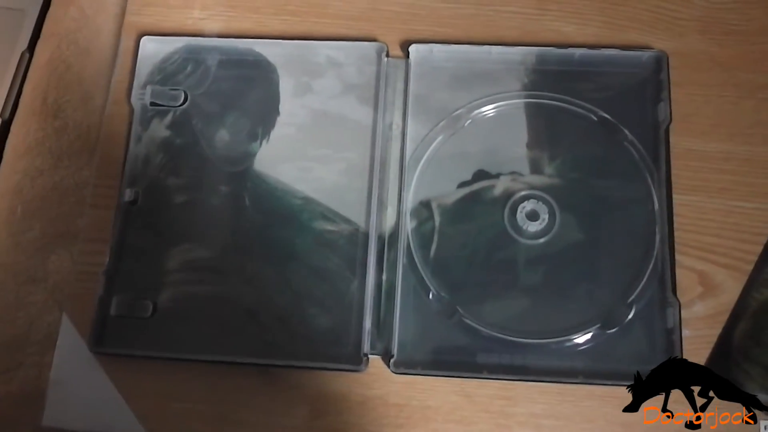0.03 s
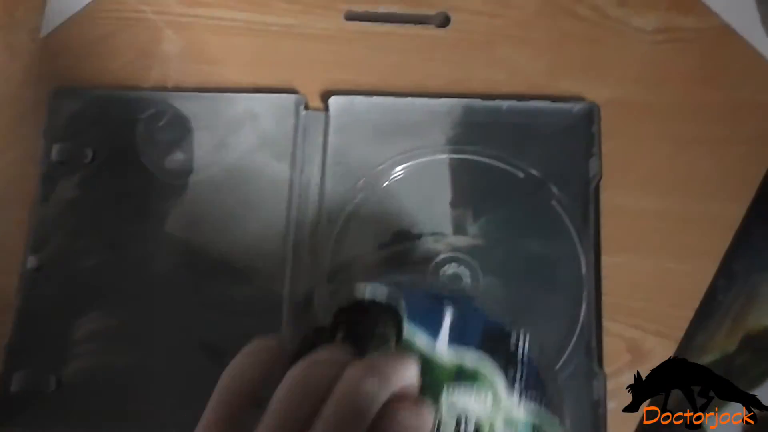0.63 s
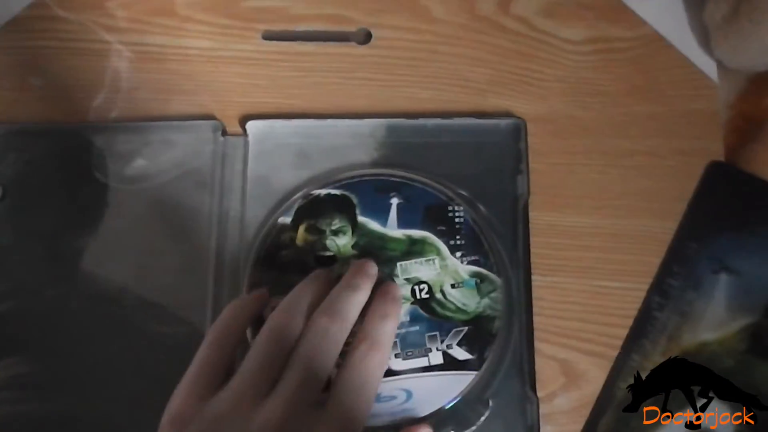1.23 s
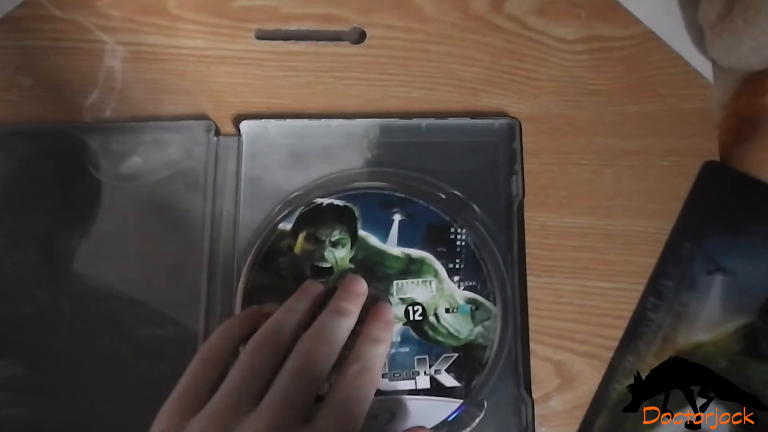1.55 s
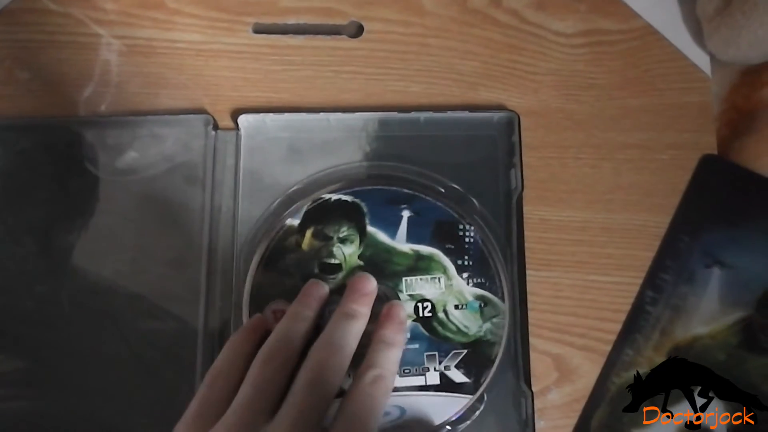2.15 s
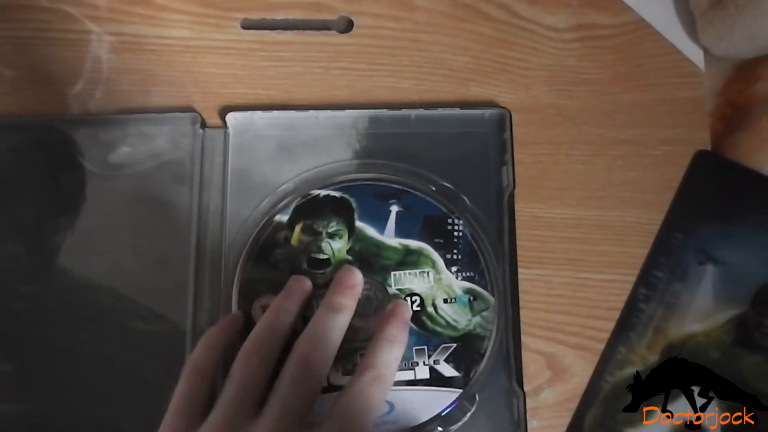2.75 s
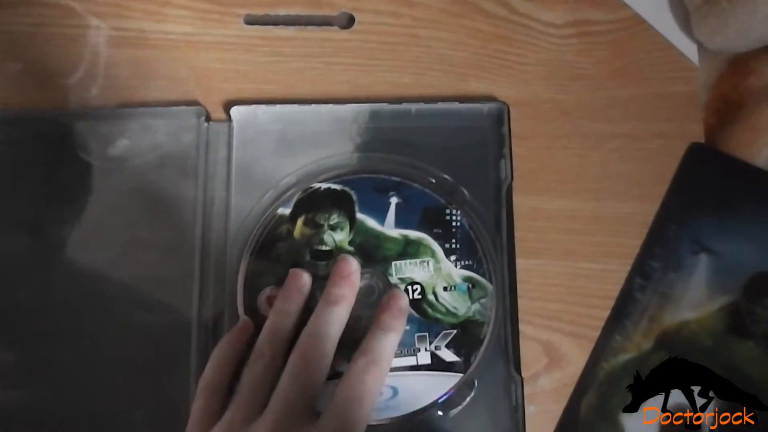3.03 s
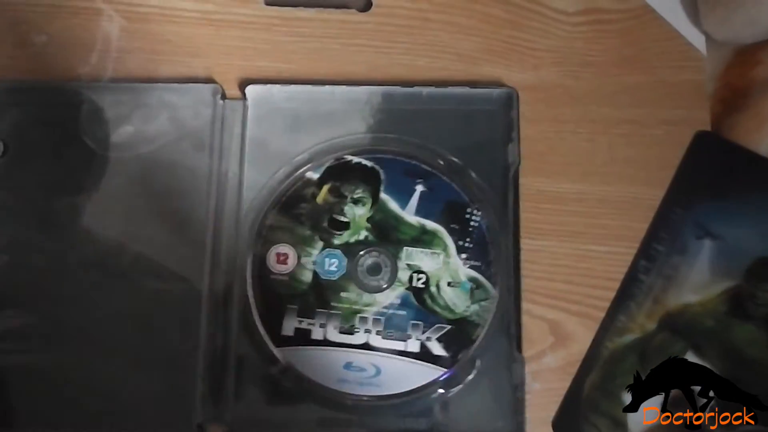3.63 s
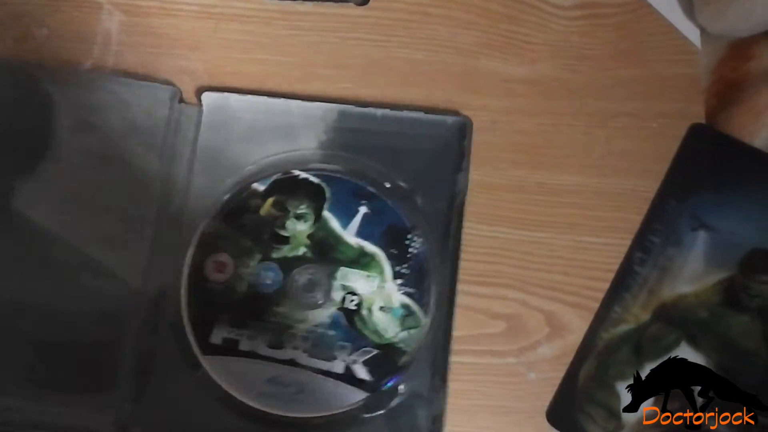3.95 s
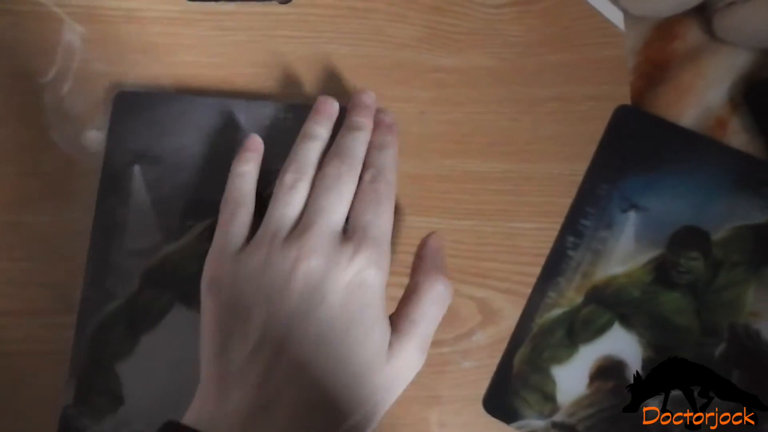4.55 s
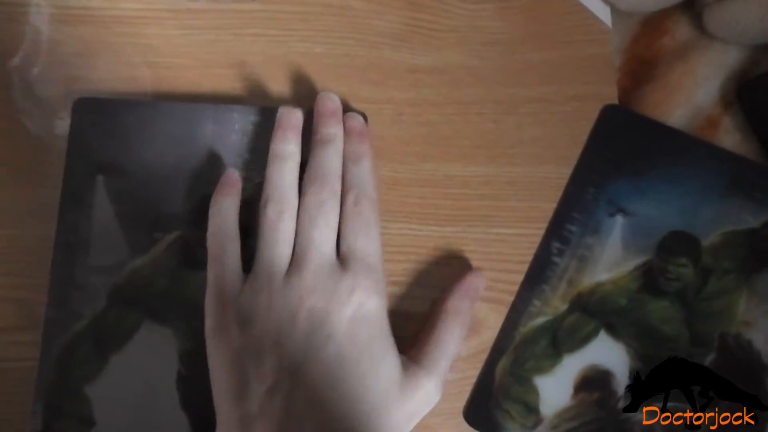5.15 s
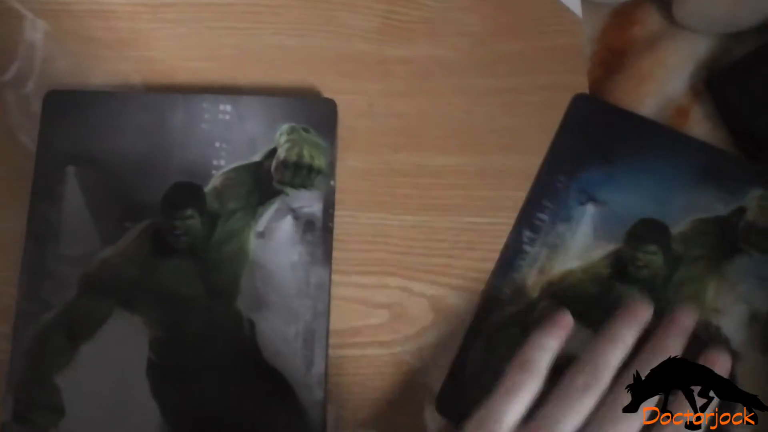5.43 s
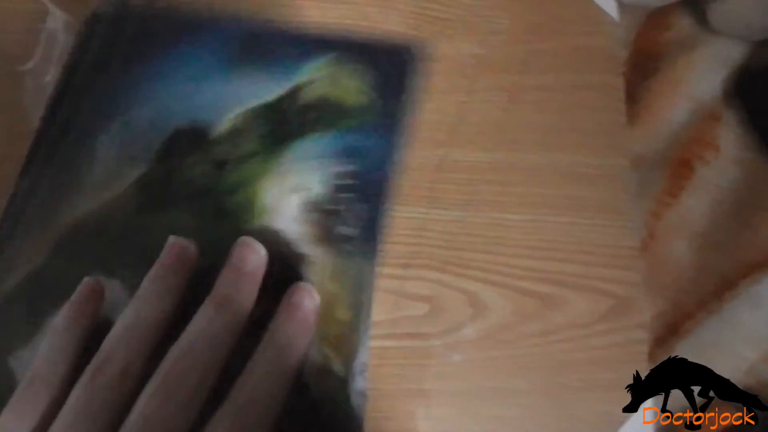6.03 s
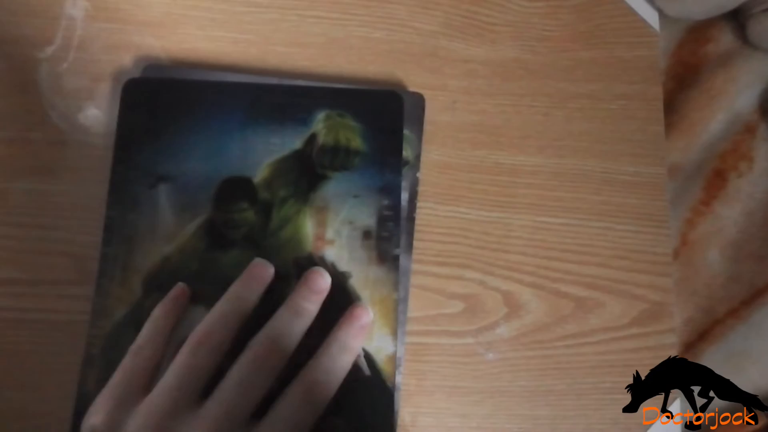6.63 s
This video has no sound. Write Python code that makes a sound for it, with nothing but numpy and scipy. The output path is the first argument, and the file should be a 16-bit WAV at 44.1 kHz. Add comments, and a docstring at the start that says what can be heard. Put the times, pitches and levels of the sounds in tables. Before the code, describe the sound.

A soft rush of air with a faint fan-like hum and low handling rumble runs throughout, in a small, quiet room with a close microphone. Hands brush softly over a metal case during the first second, with a light knock at 0.5. From 1 to 3 seconds a disc is pressed onto a plastic hub, giving scattered small clicks and creaks, sharper around 1.2 and 2.7. At 3.1 it seats with a very loud, bright snap. A small creak and faint finger rubbing follow. At 4.4 the metal lid slaps shut with a short thud and crack, followed by light knocks and a firm latching snap at 5.1. Around 5.5 a second case knocks and scrapes briefly across the wooden desk. It lands on the first with clacks at 6.2 and 6.3, then slides in short, light hisses until about 6.8.

```python
"""In a small, quiet room, hands brush over a metal case on a wooden desk, close to a handheld camera.
A disc is pressed onto the plastic hub inside: it sticks and slips, creaking, and snaps home at 3.1 s.
The lid is slapped shut at 4.4 s and pressed until it latches at 5.1 s. From 5.5 s a second case is
dragged off the desk, set down on the first and slid straight. After the hardest snaps the camera
turns its own volume down for a moment."""
import sys
import numpy as np
from scipy import signal
from scipy.fft import next_fast_len
from scipy.io import wavfile
from scipy.ndimage import uniform_filter1d

SR = 44100
rng = np.random.default_rng(int(sys.argv[2]) if len(sys.argv) > 2 else 0)


def unload_audio(sound):
    """Save the sound as a 16-bit wav file, at the path given as the first command line argument."""
    columns = np.transpose(np.atleast_2d(sound))
    # keep every value between -1 and 1, then stretch to whole-number steps
    steps = np.round(np.clip(columns, -1, 1) * 32767)
    wavfile.write(sys.argv[1], SR, steps.astype(np.int16))


N = 298896
T = np.arange(SR // 6) / SR  # time axis of one short sound, in seconds

# soft rush of the room's air: f/Hz, level/dB
AIR_SPECTRUM = [(60, -16), (100, -1.5), (175, -8.5), (250, -3.5), (330, -11), (450, -9.5), (700, -5),
                (1150, -9.5), (1550, -10.5), (1750, -8), (2100, -14), (2500, -24.5), (4300, -25),
                (6500, -23), (15500, -27.5)]
# tones like a small fan's: f/Hz, level compared with the air/dB
HUM_TONES = [(242, -9.5), (840, -23.5)]
# rumble of the hand holding the camera: f/Hz, level/dB
RUMBLE_SPECTRUM = [(15, -22.5), (30, -12), (42, 8), (60, -6), (100, -13.5), (180, -28.5), (400, -48.5)]
# how that rumble changes with the unsteady grip: t/s, level/dB
GRIP_LEVELS = [(0, -40), (0.3, -54), (0.6, -50), (1.6, -54.5), (2.5, -50), (3, -54), (5.5, -62.5),
               (6.7, -59.5)]
# hand and sleeve brushing over case and desk: start/s, end/s, hiss/dB, body/dB
HAND_RUBS = [(0.028, 0.204, -51, -53), (0.397, 0.561, -53, -51), (0.501, 0.719, -51, -45),
             (0.639, 0.98, -49, -42), (3.691, 3.939, -48, -58), (4.163, 4.24, -47, -62),
             (4.191, 4.551, -51, -50.5), (5.234, 5.308, -54.5, -75), (5.701, 6.202, -57.5, -63)]
# the "body", the lower sound of a rubbed object: f/Hz, level/dB
BODY_SPECTRUM = [(300, 5.5), (680, 4), (950, -3), (1300, 2.5), (1600, -1), (1950, -5), (2400, -9.5),
                 (4000, -30.5)]
# where the hands are: t/s, left minus right/dB
HAND_PLACES = [(0.5, 4), (4.2, 2.5), (4.43, 1), (5.25, 5), (5.55, -10), (5.72, -0.5), (6.3, -1),
               (6.7, -0.5)]
# cases hitting the desk and each other: t/s, thud/dB, pitch of the blow/Hz, tray ring/dB, crack/dB
CASE_KNOCKS = [(0.5176, -37, 520, -42, -47.5), (3.635, -44, 110, -60, -70), (3.995, -47, 620, -46, -60),
               (4.4244, -9.5, 372, -24.5, -25), (4.4301, -15, 880, -24.5, -21.5),
               (4.478, -40, 200, -65, -59), (4.6958, -33, 368, -30, -43), (4.7481, -26, 435, -37.5, -45.5),
               (5.053, -40, 110, -47, -56), (5.0821, -8, 360, -12.5, -20), (5.0902, -32, 280, -29, -29),
               (5.1792, -48, 650, -55, -59), (5.2556, -44.5, 220, -54.5, -54),
               (5.5456, -28.5, 196, -44.5, -43.5), (5.5806, -42.5, 400, -46.5, -36.5),
               (6.1939, -24.5, 627, -36, -38.5), (6.3083, -25, 740, -33.5, -29),
               (6.3207, -29.5, 800, -37, -18.5), (6.652, -47.5, 240, -57, -55)]
# ringing tones of the metal shell on the desk: f/Hz, level/dB, time to fade by 60 dB/s
SHELL_TONES = [(85, -13.5, 0.1), (158, -8.5, 0.077), (247.3, -3, 0.059), (339, -1, 0.032), (468, 0, 0.025),
               (568, -4.5, 0.023), (793, -4, 0.041), (912, -5, 0.028), (956, -2, 0.022), (1166, -6, 0.028),
               (1247, -5, 0.043)]
# ringing tones of the disc and plastic tray: f/Hz, level/dB, time to fade by 60 dB/s
DISC_TONES = [(185, -18, 0.022), (323, -20, 0.062), (674, -11, 0.03), (905, -19, 0.052), (1349, -8, 0.033),
              (1517, -3, 0.025), (1697, 1, 0.022), (1607, 3.5, 0.0051), (1893, 2.5, 0.013),
              (2184, -11.5, 0.032), (2316, -8.5, 0.016)]
# high ringing tones of tray and shell: f/Hz, level/dB, time to fade by 60 dB/s
HIGH_TONES = [(3840, -13.5, 0.044), (4300, -4.5, 0.046), (5170, -4.5, 0.052), (5510, 5.5, 0.028),
              (6190, 0.5, 0.023), (7150, -13, 0.015), (6560, -4.5, 0.031), (8800, 0, 0.017)]
# bright noise of a crack: f/Hz, level/dB
CRACK_SPECTRUM = [(100, -13), (1000, -13.5), (2000, -13.5), (3200, -2.5), (4500, -5), (6500, 2.5),
                  (8700, -1.5), (10500, -8.5), (14000, -13), (16500, -21)]
# the disc clicking on the hub and, last, the lid's latch: t/s, disc ring/dB, crack/dB
PLASTIC_CLICKS = [(1.0465, -29.5, -32), (1.0702, -34.5, -42.5), (1.1436, -38, -52), (1.1705, -23, -29.5),
                  (1.1721, -18, -16.5), (1.2002, -29, -45), (1.2277, -32.5, -52), (1.5457, -35, -60),
                  (2.1684, -31, -35), (2.197, -53, -34.5), (2.5445, -34, -51.5), (2.5668, -34.5, -60.5),
                  (2.6746, -22.5, -27.5), (2.6856, -17, -19.5), (3.099, -28, -50), (3.1342, -4, 9),
                  (3.136, 8, 5), (3.1434, -1.5, -9.5), (3.6281, -43, -52), (5.0825, -17, -14)]
# the hub creaking under the fingers: time of most strain/s, level/dB, rise and fall time/s
HUB_CREAKS = [(1.155, -40.5, 0.023), (1.212, -36, .014), (1.329, -39.5, .004), (1.496, -47, 0.0028),
              (1.555, -31.5, .01), (1.621, -37, 0.027), (1.813, -45.5, 0.0042), (1.9489, -38.5, .002),
              (1.966, -38, 0.012), (1.986, -42.5, .004), (2.11, -37.5, 0.02), (2.151, -32.5, .008),
              (2.208, -36.5, 0.013), (2.249, -43, 0.0049), (2.564, -40.5, 0.048), (2.639, -35.5, .005),
              (2.672, -30, 0.0022), (2.81, -44, 0.0055), (2.9667, -43, 0.0046), (3.3895, -38, 0.0018),
              (3.406, -29.5, 0.0073)]
# fingertips dragging on the tray: start/s, end/s, level/dB
FINGER_DRAGS = [(3.452, 4.125, -51), (4.528, 4.604, -45.5)]
# a case sliding on the desk, then on the other: start/s, fastest/s, end/s, hiss/dB, hiss f/Hz, body/dB
CASE_SCRAPES = [(5.57, 5.665, 5.71, -30, 7800, -42.5), (5.68, 5.748, 5.778, -49, 5600, -42),
                (6.32, 6.372, 6.445, -36, 6200, -43), (6.49, 6.56, 6.63, -51, 7200, -62),
                (6.555, 6.607, 6.69, -42, 10500, -62), (6.655, 6.725, 6.8, -47, 8700, -66)]
# how long the room echoes: f/Hz, time to fade by 60 dB/s
ECHO_TIMES = [(150, 0.16), (1000, 0.12), (6000, 0.15), (15000, 0.056)]
# balance of the two microphones: f/Hz, left minus right/dB
MIC_BALANCE = [(40, -2.5), (150, -2.5), (500, -2.5), (1500, -1.5), (3000, 1.5)]


def amp(db):
    """Turns decibels into a number to multiply by."""
    return 10 ** (np.asarray(db) / 20)


def unit(x):
    """Scales a signal to an average power of 1."""
    return x / np.sqrt(np.mean(x ** 2) + 1e-20)


def read(points, hz):
    """Looks up a frequency in a table, blending between its rows."""
    f, value = np.transpose(points)
    return np.interp(np.log(hz + 1), np.log(f), value)


def add(mix, s, sound):
    """Mixes a stereo sound in at s seconds."""
    part = mix[:, max(round(s * SR), 0):][:, :sound.shape[1]]
    part += sound[:, :part.shape[1]]


def sides(db):
    """Left and right volumes, with the left louder by db."""
    return unit(amp(np.array([[db], [-db]]) / 2))


def hand_db(s):
    """How far left the hands are at s seconds, as left minus right in dB."""
    return np.interp(s, *np.transpose(HAND_PLACES))


def noise(count, alike=0.94):
    """White noise at two nearby microphones; alike=1 makes both sides the same."""
    a, b = rng.standard_normal((2, count))
    return np.array([a, alike * a + np.sqrt(1 - alike ** 2) * b])


def colour(x, db_at):
    """Turns each frequency up or down by db_at(hz), with no ringing ahead of the sound."""
    n = next_fast_len(x.shape[-1] + len(T))
    hz = abs(np.fft.fftfreq(n, 1 / SR))
    log_gain = np.log(amp(np.maximum(db_at(hz), -100)))
    response = np.exp(signal.hilbert(log_gain).conj())
    return np.fft.ifft(np.fft.fft(x, n) * response).real[..., :x.shape[-1]]


def high_pass_db(hz, edge_hz, order):
    """Filter curve that cuts below edge_hz; swap the two frequencies to cut above it."""
    return -10 * np.log10(1 + (edge_hz / (hz + 1)) ** (2 * order))


def at_level(x, db, spread_s=0.01):
    """Scales a short sound so that its energy, spread over spread_s, has the level db."""
    return amp(db) * x * np.sqrt(spread_s * SR / np.mean(np.sum(x ** 2, axis=-1)))


def room_air(air_db=-47.5, fade_from_s=3.52, fade_db_per_s=1.53, waver_hz=2.5, flutter_db=2.0):
    """A soft rush with a wavering hum; both hold their level, then slowly grow fainter."""
    air = unit(colour(noise(N, alike=0.3), lambda hz: read(AIR_SPECTRUM, hz)))
    for hz, db in HUM_TONES:
        drift, flutter = unit(uniform_filter1d(rng.standard_normal((2, N)), size=3000))
        cycles = np.cumsum(hz + waver_hz * drift) / SR
        air = air + amp(db + flutter_db * flutter) * np.sin(2 * np.pi * cycles)
    fading_s = np.maximum(np.arange(N) / SR - fade_from_s, 0)
    return amp(air_db - fade_db_per_s * fading_s) * air


def grip_rumble():
    """An unsteady hand on the camera makes a deep rumble."""
    rumble = unit(colour(noise(N), lambda hz: read(RUMBLE_SPECTRUM, hz)))
    return amp(np.interp(np.arange(N) / SR, *np.transpose(GRIP_LEVELS))) * rumble


def stroke_speed(start, end, peak=None):
    """A stroke speeds up and slows to rest; unless told when, it is fastest just before halfway."""
    if peak is None:
        peak = start + 0.43 * (end - start)
    return np.sin(np.pi / 2 * np.interp(np.arange(start, end, 1 / SR), [start, peak, end], [0, 1, 0]))


def friction(swell, hiss_db, body_db, pan_db, centre_hz, octaves, body_low_hz):
    """Tiny surface bumps hiss under a stroke and shake the rubbed object, in uneven surges."""
    fine, slow = rng.standard_normal((2, len(swell)))
    grain_db = 2.0 * unit(uniform_filter1d(fine, size=20))
    surge_db = 0.7 * unit(uniform_filter1d(slow, size=600))
    bumps = amp(grain_db + surge_db)
    low_hz, top_hz = centre_hz * 2 ** (-octaves / 2), centre_hz * 2 ** (octaves / 2)
    hiss = colour(noise(len(swell), alike=0.57) * bumps,
                  lambda hz: high_pass_db(hz, low_hz, order=5) + high_pass_db(top_hz, hz, order=4))
    body = colour(noise(len(swell)) * bumps,
                  lambda hz: read(BODY_SPECTRUM, hz) + high_pass_db(hz, body_low_hz, order=2))
    return swell * (amp(hiss_db) * sides(pan_db) * unit(hiss) + amp(body_db) * unit(body))


def hand_rubs():
    """Hand and sleeve brush softly over case and desk, loudest when they move fastest."""
    out = np.zeros((2, N))
    for start, end, hiss_db, body_db in HAND_RUBS:
        add(out, start, friction(stroke_speed(start, end), hiss_db, body_db, hand_db(start),
                                 centre_hz=5500, octaves=1.81, body_low_hz=590))
    return out


def ring(tones, blow_hz=None):
    """A struck object rings with fading tones; a blow favours those near its own pitch."""
    hz, db, fade_s = np.transpose(tones)[:, :, None]
    weight, shift, lag = rng.standard_normal((3, len(tones), 1))
    db = db + 2 * weight  # each spot that is hit gives a new mix
    if blow_hz:
        db = db - 2.7 * np.log2(hz / blow_hz) ** 2
    hz = hz + 0.81 * np.sqrt(hz) * shift  # the grip shifts each tone a little
    phase = np.arange(len(tones))[:, None] / 2 + 0.14 * lag  # neighbouring tones swing opposite ways
    return np.sum(amp(db - 60 * T / fade_s) * np.sin(2 * np.pi * (hz * T + phase)), axis=0)


def crack(slip_s, db, pan_db, squeak_db=0, chatter_db=-17, treble_db=0):
    """A burst of tiny uneven slips, a short chatter of loose parts, and the high ringing they leave."""
    def spectrum_db(hz):
        squeak = squeak_db * np.exp(-((hz - 8700) / 900) ** 2)  # the hub's small springy teeth
        treble = treble_db * amp(high_pass_db(hz, 10500, order=4))
        return read(CRACK_SPECTRUM, hz) + squeak + treble

    fade = np.exp(-T / slip_s) + amp(chatter_db) * np.exp(-T / 0.0059)
    slips = amp(3 * unit(uniform_filter1d(rng.standard_normal(len(T)), size=10)))
    burst = colour(noise(len(T), alike=0.86) * fade * slips, spectrum_db)
    return sides(pan_db) * at_level(at_level(burst, 0) + at_level(ring(HIGH_TONES), -11), db)


def case_knocks(rise_s=0.00013, contact_s=0.0024, desk_hz=138, desk_fade_s=0.01):
    """The shell thuds, the desk booms faintly, the tray inside rings, and the hard rims crack together."""
    out = np.zeros((2, N))
    rise = 1 - np.exp(-T / rise_s)
    for s, thud_db, blow_hz, tray_db, crack_db in CASE_KNOCKS:
        thud = at_level(rise * ring(SHELL_TONES, blow_hz), thud_db)
        desk = at_level(np.exp(-T / desk_fade_s) * np.sin(2 * np.pi * desk_hz * T), thud_db - 20)
        tray = at_level(rise * ring(DISC_TONES, blow_hz=1700), tray_db)
        add(out, s, thud + desk + tray + crack(contact_s, crack_db, hand_db(s)))
    return out


def plastic_clicks(slip_s=0.00056, damp_s=0.00034):
    """Plastic sticks, then slips: the disc rings and the shell takes the kick, up to a limit."""
    out = np.zeros((2, N))
    rise = 1 - np.exp(-2 * T / slip_s)
    held = rise * (0.37 + np.exp(-T / damp_s))  # the fingers soak up most of the ring at once
    for s, disc_db, crack_db in PLASTIC_CLICKS:
        disc = at_level(held * ring(DISC_TONES), disc_db)
        shell = at_level(held * ring(SHELL_TONES, blow_hz=260), min(disc_db - 17, -35))
        add(out, s, disc + shell + crack(slip_s, crack_db, pan_db=-2, squeak_db=1.5, treble_db=7.5))
    return out


def hub_creaks(slips_per_s=550, size_db=6.5, main_slip_db=9, damp_s=0.023, spots=3):
    """Strained plastic lets go in many tiny slips around one larger one, at several spots on the hub."""
    out = np.zeros((2, N))
    t = np.arange(-SR // 12, SR // 12) / SR
    for s, db, spread_s in HUB_CREAKS:
        strain = np.exp(-abs(t) / spread_s)
        creak = 0
        for spot in range(spots):
            slipping = rng.random(len(t)) < slips_per_s / spots / SR
            sizes = amp(size_db * np.minimum(rng.exponential(1, len(t)), 2))
            slips = strain * slipping * sizes
            if spot == 0:
                slips[t == 0] += amp(main_slip_db)
            tick = crack(slip_s=0.00028, db=0, pan_db=-1, squeak_db=7, chatter_db=-25)
            disc = at_level(np.exp(-T / damp_s) * ring(DISC_TONES), db=5)
            creak = creak + signal.fftconvolve(slips[None], tick + disc, axes=1)  # one copy per slip
        add(out, s + t[0], at_level(creak, db))
    return out


def finger_drags(pitch_hz=1790, width_hz=310):
    """Dragging fingertips make the tray sing faintly: noise in a narrow band around one pitch."""
    out = np.zeros((2, N))
    for start, end, db in FINGER_DRAGS:
        speed = stroke_speed(start, end)
        song = colour(noise(len(speed)),
                      lambda hz: high_pass_db(width_hz / 2, abs(hz - pitch_hz), order=1))
        add(out, start, amp(db) * speed * unit(song))
    return out


def case_scrapes():
    """The sliding metal case makes a brighter hiss that swells steeply with its speed."""
    out = np.zeros((2, N))
    for start, peak, end, hiss_db, centre_hz, body_db in CASE_SCRAPES:
        swell = stroke_speed(start, end, peak) ** 1.38
        add(out, start, friction(swell, hiss_db, body_db, hand_db(peak), centre_hz,
                                 octaves=1.36, body_low_hz=1000))
    return out


def room_echo(x, echo_db=-25, delay_s=0.005):
    """Sound bounces off desk and walls, and each frequency dies away at its own speed."""
    count = SR // 2
    bounces = noise(count, alike=1.0) * (rng.random(count) < 0.1) * (np.arange(count) > delay_s * SR)
    hz, t, bands = signal.stft(bounces, SR, nperseg=256)
    fade = amp(-60 * t / read(ECHO_TIMES, hz)[:, None])
    tail = signal.istft(bands * fade, SR, nperseg=256)[1]
    return x + amp(echo_db) * signal.fftconvolve(x, tail / np.linalg.norm(tail[0]), axes=1)[:, :N]


def gain_control(x, ceiling_db=-4, recover_db_per_s=38.5, quiet_boost_db=4.5):
    """The volume drops at once on a loud peak, then creeps back; the boost for quiet sound stays lost."""
    power_db = 10 * np.log10(abs(uniform_filter1d((x ** 2).mean(0), size=16)) + 1e-12)
    over_db = np.maximum(power_db + quiet_boost_db - ceiling_db, 0)
    recovery_db = recover_db_per_s * np.arange(N) / SR
    dip_db = np.maximum.accumulate(over_db + recovery_db) - recovery_db
    lost_db = np.minimum(np.maximum.accumulate(over_db), quiet_boost_db)
    return x * amp(quiet_boost_db - uniform_filter1d(np.maximum(dip_db, lost_db), size=44))


def scene():
    """The sounds on the desk with their echo, over the room's air and the rumble of the grip."""
    desk = plastic_clicks() + hub_creaks() + case_knocks() + hand_rubs() + case_scrapes() + finger_drags()
    return room_echo(desk) + room_air() + grip_rumble()


def record(dry, peak_limit=0.78, cutoff_hz=16100):
    """The camera hears more bass on the right, turns loud snaps down and cuts the highest treble."""
    left = colour(dry[0], lambda hz: read(MIC_BALANCE, hz) / 2)
    right = colour(dry[1], lambda hz: -read(MIC_BALANCE, hz) / 2)
    x = gain_control(np.array([left, right]))
    x = x / (1 + (x / peak_limit) ** 6) ** (1 / 6)  # rounds off the tallest peaks
    low_pass = signal.firwin(301, cutoff_hz, window=("kaiser", 9), fs=SR)
    return signal.oaconvolve(x, low_pass[None], "same")


dry = scene()
out = record(dry)
unload_audio(out)
```